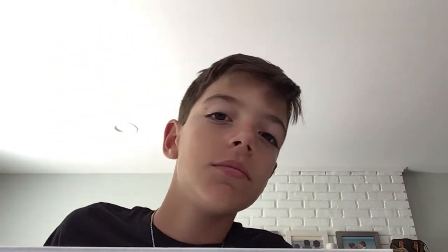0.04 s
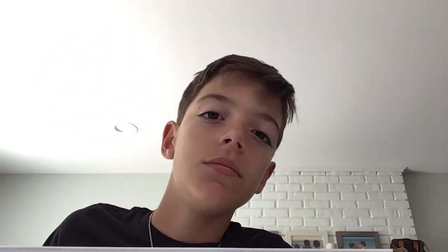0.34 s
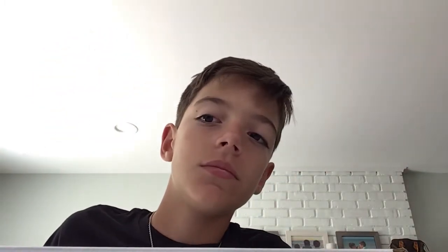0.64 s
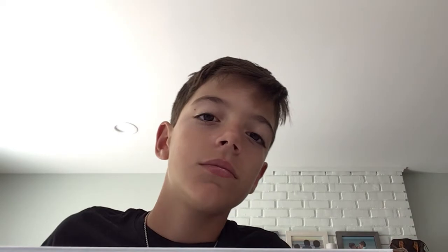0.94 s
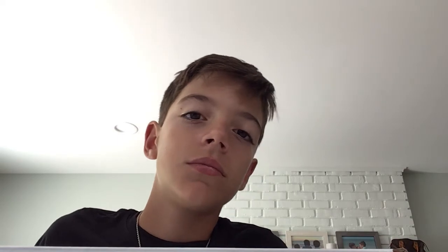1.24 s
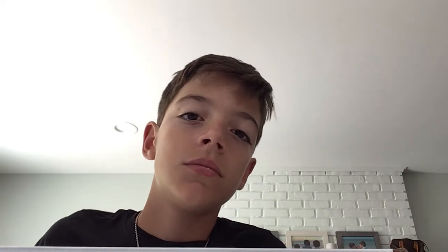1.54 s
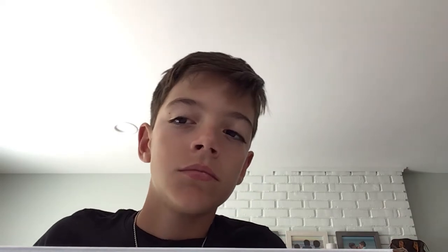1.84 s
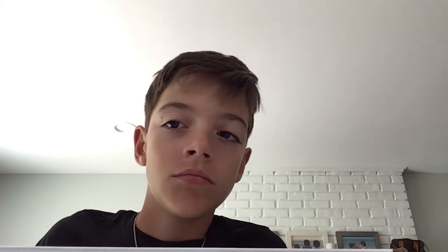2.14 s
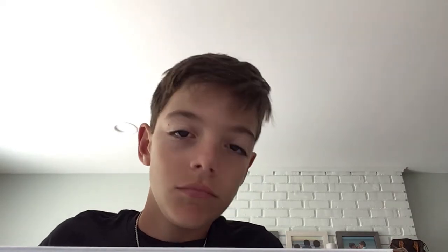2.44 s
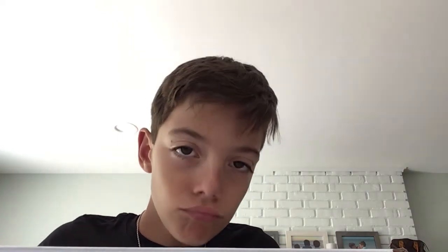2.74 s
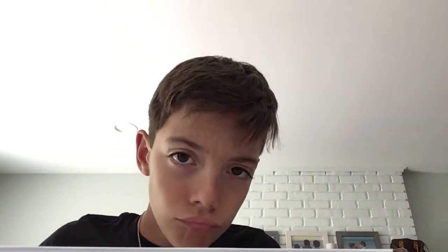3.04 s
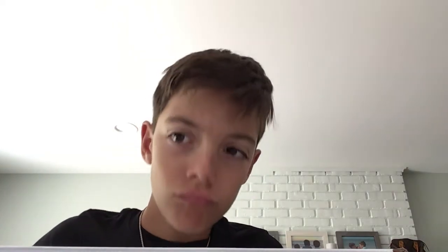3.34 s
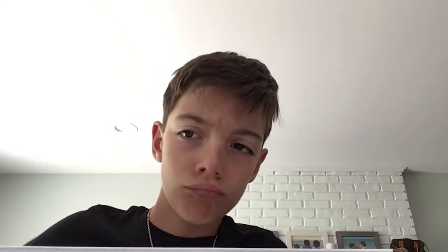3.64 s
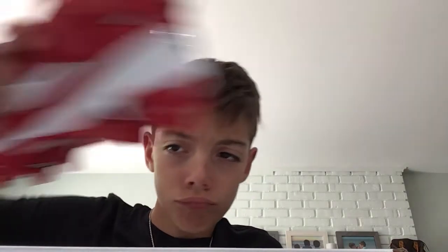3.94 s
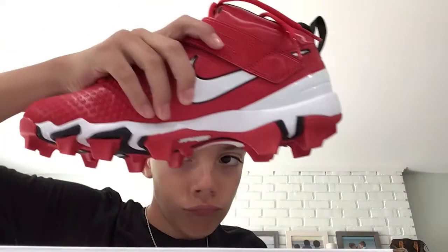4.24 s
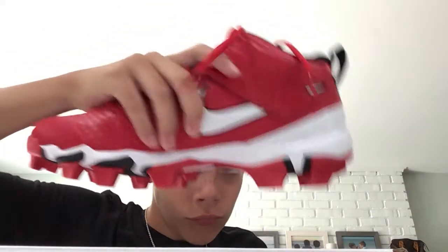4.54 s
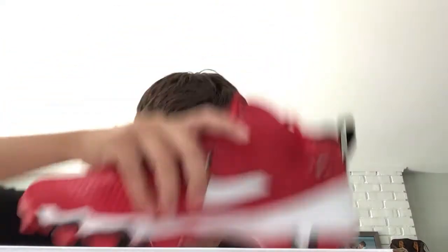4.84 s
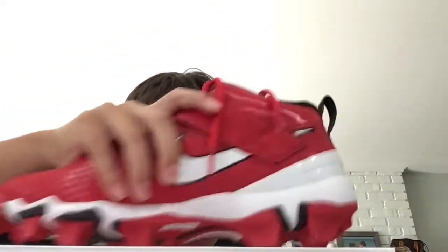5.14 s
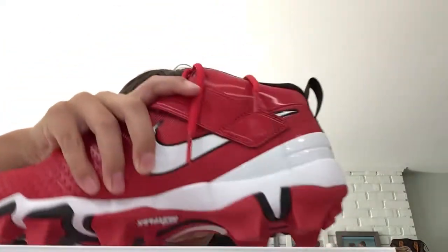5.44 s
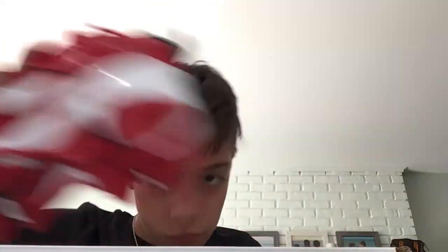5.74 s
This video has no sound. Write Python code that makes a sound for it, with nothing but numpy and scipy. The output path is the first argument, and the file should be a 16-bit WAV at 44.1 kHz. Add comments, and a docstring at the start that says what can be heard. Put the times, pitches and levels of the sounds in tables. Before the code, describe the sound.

Faint, steady room air runs throughout, heard from a microphone close by on a desk. At about 0.7 seconds a light rustle begins, followed near 1.1 seconds by a quick cluster of soft, dull hand knocks, each with a small hollow ring, and a brief scuff of skin. A low rub at 1.5 seconds leads into more knocks and scuffs from 1.7 to 2.1, and again from 2.6 to 3. At 3.3 seconds comes one more soft knock and a small, bright metallic tick. From 3.8 to 4.6 a shoe is lifted with a faint rustle and a few tiny, very high squeaks. At 4.9 and 5.25 seconds its studded sole is tapped on the desk, by far the loudest sounds: sharp snaps with a brief rattle and a low boom, ringing shortly in the room. Then only the room air remains.

```python
"""A desk in a quiet room, the microphone close to a baseball cleat being handled.
Over steady room air, the hands rustle, make soft knocks that ring a small hollow casing, and scuff.
Just after three seconds a bit of metal ticks; then the shoe is lifted with a faint rustle and thin squeaks.
Around five seconds its studded sole is tapped twice on the desk: the studs snap, the shoe rattles,
the desk top booms and the room answers."""
import sys
import numpy as np
from scipy import signal
from scipy.fft import rfft, irfft
from scipy.io import wavfile
from scipy.ndimage import uniform_filter1d

SR = 44100
rng = np.random.default_rng(int(sys.argv[2]) if len(sys.argv) > 2 else 0)


def unload_wav(signal):
    """Save mono or channel-first audio to the path in sys.argv[1] as 16-bit WAV at rate SR, clipped to [-1, 1]."""
    wavfile.write(
        sys.argv[1],
        SR,
        np.round(np.clip(np.atleast_2d(signal).T, -1, 1) * 32767).astype(np.int16),
    )


N = 259654
T = np.arange(SR // 2) / SR  # time since a contact, s


def amp(db):
    """Decibels to gain."""
    return 10 ** (np.asarray(db) / 20)


def unit_rms(x):
    """Scales to rms 1."""
    return x / np.sqrt(np.mean(x ** 2) + 1e-20)


def lookup(table, hz, column=1):
    """Reads one column of a table along log frequency."""
    columns = np.transpose(table)
    return np.interp(np.log(hz + 1), np.log(columns[0] + 1), columns[column])


def add(mix, start, sound):
    """Mixes a sound in at a start time in seconds."""
    part = mix[max(round(start * SR), 0):][:len(sound)]
    part += sound[:len(part)]


def hump(hz, octaves):
    """A flat-topped spectrum around one pitch, as rows of f/Hz, level/dB."""
    away = np.arange(-20, 21) / 10
    return np.transpose([hz * 2 ** (away * octaves), -4.3 * away ** 4])


def noise(spectrum, size=len(T)):
    """Noise of rms 1 with the given spectrum."""
    colour = amp(lookup(spectrum, np.fft.rfftfreq(size, 1 / SR)))
    return unit_rms(irfft(rfft(rng.standard_normal(size)) * colour, size))


def roughness(size, depth_db, grain_samples):
    """The randomly wavering gain of uneven friction."""
    return amp(depth_db * unit_rms(uniform_filter1d(rng.standard_normal(size), grain_samples)))


def onset(rise):
    """A smooth climb to full level over the rise time in seconds."""
    return np.sin(np.pi / 2 * np.minimum(T / rise, 1)) ** 2


def fade(t60, rise):
    """A contact builds up over the rise time, then dies away."""
    return onset(rise) * amp(-60 * T / t60)


def burst(spectrum, t60, rise):
    """A short contact noise whose spectrum is kept smooth, so that it has no pitch of its own."""
    envelope = fade(t60, rise)
    colour = amp(lookup(spectrum, np.fft.rfftfreq(len(T), 1 / SR)))
    x = envelope * noise(spectrum)
    for _ in range(2):
        phase = np.angle(rfft(x))
        x = irfft(colour * np.exp(1j * phase), len(T)) * envelope ** (1 / 3)
    return unit_rms(x * onset(rise)) * np.sqrt(np.mean(envelope ** 2))


def ring(modes, rise, spread):
    """Damped modes of alternating sign, a little detuned at each blow."""
    detune = 1 + spread * rng.standard_normal(len(modes))
    return sum((-1) ** k * amp(db) * fade(t60, rise) * np.sin(2 * np.pi * hz * detune[k] * T)
               for k, (hz, db, t60) in enumerate(modes))


# air of the room: f/Hz, relative level/dB
AIR_SPECTRUM = [(15, -79), (25, -68), (43, -14.5), (108, -3.5), (145, 3), (180, -7.5), (242, -9.5),
                (317, -13), (354, -3.5), (384, -24.5), (416, -10), (1040, -25), (1230, -26), (7710, -34.5),
                (16000, -43)]
# faint tones in the room: f/Hz, level/dB
ROOM_HUM = [(140, -73.5), (356, -73.5), (414, -69.5)]


def room_tone():
    """The quiet room at the microphone: steady air noise with a few wavering low tones."""
    tones = sum(amp(db) * noise(hump(hz, octaves=0.038), size=N) for hz, db in ROOM_HUM)
    return amp(-58) * noise(AIR_SPECTRUM, size=N) + tones


# strokes of sleeve and shoe: start t/s, end t/s, level/dB, centre f/Hz
RUB_STROKES = [(0.699, 0.936, -75.5, 2490), (0.72, 1.06, -76, 9500), (1.5, 1.66, -53.5, 156),
               (1.625, 1.726, -72.5, 8400), (3.857, 4.053, -66.5, 2070), (4.047, 4.5, -78.5, 11000),
               (3.8, 4.6, -64.5, 136)]


def rubs():
    """Cloth and shoe rub slowly near the microphone, each stroke swelling as it gathers speed."""
    out = np.zeros(N)
    for start, end, db, hz in RUB_STROKES:
        n = round((end - start) * SR)
        catch = roughness(n, depth_db=3, grain_samples=300)
        stroke = amp(db + np.linspace(-1, 1, n)) * signal.windows.tukey(n, .3)
        friction = unit_rms(catch * noise(hump(hz, octaves=.82), size=n))
        add(out, start, stroke * friction)
    return out


# hands knocking at the desk: t/s, force level/dB, casing ring level/dB
HAND_KNOCKS = [(.753, -49.5, -56), (.888, -54, -50.5), (1.045, -36, -42), (1.053, -29.5, -27.5),
               (1.1, -27.5, -22), (1.735, -33.5, -47), (1.746, -31, -33), (1.792, -22.5, -26),
               (1.8975, -45, -29.5), (1.995, -34, -35.5), (2.0337, -34.5, -29.5), (2.0623, -42, -29),
               (2.576, -51, -42.5), (2.6861, -31, -25), (2.756, -37.5, -43), (2.773, -38.5, -50),
               (2.837, -40.5, -28.5), (2.8715, -38.5, -28), (3.3214, -38.5, -34)]
# dull thump of a knock: f/Hz, relative level/dB
THUMP_SPECTRUM = [(40, -16), (60, -6), (92, 7), (125, 1), (200, 0.5), (280, -0.5), (400, 0.5), (700, -5),
                  (1050, -9), (2000, -29), (6000, -40)]


def soft_knocks():
    """A small click of first contact over a dull thump; the harder the knock, the louder its click."""
    firm_db, firm_click_db, click_growth = -30, -39.5, 1.59  # growth in dB per dB of force
    out = np.zeros(N)
    for start, force_db, _ in HAND_KNOCKS:
        click_db = firm_click_db + click_growth * (force_db - firm_db)
        click = burst(hump(1896, octaves=0.75), t60=0.027, rise=0.0017)
        add(out, start - .0028, amp(click_db) * click)
        add(out, start, amp(force_db) * burst(THUMP_SPECTRUM, t60=0.068, rise=0.0035))
    return signal.sosfilt(signal.butter(4, [72, 7000], "bandpass", fs=SR, output="sos"), out)


# modes of the small casing: f/Hz, relative level/dB, t60/s
CASING_MODES = [(367, -10, 0.029), (493, -6.5, 0.083), (592.7, 3.5, 0.044), (644, -11, 0.036),
                (949, -21.5, 0.023)]


def casing_ring():
    """Each soft knock rings a small hollow casing beside the microphone."""
    out = np.zeros(N)
    for start, _, ring_db in HAND_KNOCKS:
        add(out, start, amp(ring_db) * ring(CASING_MODES, rise=.0014, spread=.012))
    return out


# skin skidding as it lands: peak t/s, level/dB, t60/s
SKIN_SCUFFS = [(1.057, -34.5, 0.14), (1.739, -37, 0.13), (1.996, -40, 0.084), (2.036, -45.5, 0.019),
               (2.684, -41.5, 0.16), (2.869, -44.5, 0.17), (2.972, -47, 0.023)]
# friction of skin: f/Hz, relative level/dB
SCUFF_SPECTRUM = [(300, 26), (1000, 3.5), (3500, 1.5), (5000, -2.5), (8000, -6), (13000, -19), (16000, -55)]


def scuffs():
    """Grainy friction swells as the grip lands and stops as it holds."""
    lead_s, grip_rise_s = 0.05, 0.0055
    from_peak = T - lead_s
    out = np.zeros(N)
    for peak, db, t60 in SKIN_SCUFFS:
        swell = np.exp(np.minimum(from_peak, 0) / grip_rise_s)
        decay = amp(-60 * np.maximum(from_peak, 0) / t60)
        grain = roughness(len(T), depth_db=4.2, grain_samples=40)
        add(out, peak - lead_s, amp(db) * swell * decay * unit_rms(grain * noise(SCUFF_SPECTRUM)))
    return out


# tiny metallic ticks: t/s, level/dB
METAL_TICKS = [(3.3443, -34), (3.476, -59), (4.392, -59)]
# snap of a tick: f/Hz, relative level/dB
TICK_SPECTRUM = [(2000, -17), (6000, -17), (7500, -18), (11000, -2), (13200, -5), (14500, -29)]
# modes of the metal: f/Hz, relative level/dB, t60/s
METAL_MODES = [(7430, -13, 0.022), (8700, -4, 0.013), (10900, -3.5, 0.011)]


def metal_ticks():
    """A small piece of metal ticks close by: a dry snap with a brief ring."""
    out = np.zeros(N)
    for start, db in METAL_TICKS:
        snap = amp(-2) * burst(TICK_SPECTRUM, t60=0.0079, rise=0.00077)
        ringing = amp(1.5) * ring(METAL_MODES, rise=.0004, spread=.003)
        add(out, start, amp(db) * (snap + ringing))
    return out


# the grip shifting on the shoe: t/s, level/dB
FINGER_SLIPS = [(4.39, -60), (4.447, -66), (4.47, -72)]


def squeaks():
    """Fingers slip on the glossy upper in faint, brief squeaks, all at one very high pitch."""
    out = np.zeros(N)
    for start, db in FINGER_SLIPS:
        add(out, start, amp(db) * fade(t60=0.061, rise=.003) * noise(hump(15300, octaves=.04)))
    return out


# single studs meeting the desk: t/s, snap level/dB, snap t60/s, clack level/dB
STUD_HITS = [(4.8822, -33, .02, -33), (4.8851, -13, .003, -20), (4.8905, -31, .012, -30),
             (5.2392, -27, .004, -22), (5.2441, -21.5, .003, -30)]
# snap of a stud: f/Hz, relative level/dB
STUD_SPECTRUM = [(200, 2), (1000, 14.5), (3300, 8.5), (5000, 0.5), (7000, 6), (11000, -1.5), (16000, -9)]
# modes of the stiff plastic sole: f/Hz, relative level/dB, t60/s
SOLE_MODES = [(1360, -16, .018), (2120, -24, .013), (2950, -8, .014), (3345, -6.5, 0.02),
              (4000, -15.5, 0.036)]


def stud_snaps():
    """Close to the microphone, hard studs hit the desk one after another and make the sole clack."""
    out = np.zeros(N)
    for start, snap_db, t60, clack_db in STUD_HITS:
        add(out, start, amp(snap_db) * burst(STUD_SPECTRUM, t60, rise=.0002))
        add(out, start, amp(clack_db) * ring(SOLE_MODES, rise=0.00045, spread=0.015))
    return out


# sole on the desk, two blows to a tap: t/s, boom level/dB, place on the desk/0-1, rattle level/dB
SOLE_BLOWS = [(4.885, -0.5, 0.29, -15.5), (4.903, -4.5, 0.9, -27.5), (5.2421, -1.5, 0.91, -23.5),
              (5.2561, -16.5, 0.86, -27.5)]
# dense rattle of the sole: f/Hz, relative level/dB
RATTLE_SPECTRUM = [(60, -12), (110, 6), (500, 8.5), (750, 4), (1200, 1), (1800, -9), (3000, -14.5),
                   (4200, -17.5), (5000, -22), (10000, -29.5), (16000, -44)]


def sole_rattle():
    """Each blow leaves the whole shoe rattling briefly."""
    out = np.zeros(N)
    for start, _, _, rattle_db in SOLE_BLOWS:
        add(out, start - .002, amp(rattle_db) * burst(RATTLE_SPECTRUM, t60=0.1, rise=0.0025))
    return out


# modes of the desk top: f/Hz, level/dB struck at place 0, level/dB struck at place 1, t60/s
DESK_MODES = [(73, -27, -14, 0.097), (94, -16, -22.5, 0.15), (148, -4, -14.5, 0.12),
              (212, -8.5, -19.5, 0.095), (250, -25, -20, 0.21), (294.8, -13, -12.5, 0.12),
              (330, -20, -24, 0.15), (372.4, -11.5, -22, 0.23), (469, -4.5, -13, 0.052),
              (586, -15.5, -24, 0.13), (662, -38, -28.5, 0.15), (823, -26, -37, 0.21),
              (874, -28.5, -31, .11), (988, -35, -26.5, 0.04), (1051, -23, -32, 0.066),
              (1213, -13.5, -53, 0.048), (1660, -41, -37, 0.085)]


def desk_boom():
    """The weight of the shoe sets the desk top booming; its deep modes take longest to build up."""
    out = np.zeros(N)
    for start, boom_db, place, _ in SOLE_BLOWS:
        for k, (hz, db_at_0, db_at_1, t60) in enumerate(DESK_MODES):
            mode_db = boom_db + db_at_0 + place * (db_at_1 - db_at_0)
            envelope = fade(t60, rise=0.0021 * (500 / hz) ** 1.83)
            add(out, start, (-1) ** k * amp(mode_db) * envelope * np.sin(2 * np.pi * hz * T))
    return out


# near wall, ceiling and far walls, heard from the desk: delay t/s, level/dB
WALL_ECHOES = [(.0068, -16), (0.0125, -13.5), (0.0157, -18), (.0225, -19), (.037, -22.5)]
# diffuse tail of the room: f/Hz, relative level/dB, t60/s
ROOM_TAIL = [(80, -6.5, 0.61), (159.5, -6, 0.28), (405, -5.5, 0.54), (1000, -14, 0.53), (3000, -7, 0.52),
             (5000, -7, 0.39), (7980, -7, 0.41), (14100, -9, 0.28)]


def room_answer(x):
    """What the room gives back: a few dull early echoes, then a diffuse tail that dies band by band."""
    early = np.zeros(len(T))
    for delay, db in WALL_ECHOES:
        early[round(delay * SR)] += amp(db)
    early = signal.lfilter(*signal.butter(1, 3000, fs=SR), early)
    hz, t, bands = signal.stft(rng.standard_normal(len(T)), SR, nperseg=256)
    t60 = lookup(ROOM_TAIL, hz, column=2)[:, None]
    bands *= amp(lookup(ROOM_TAIL, hz)[:, None] - 60 * t / t60)
    bands *= np.sqrt(2 * np.log(1000) / (t60 * SR))  # a band's energy is independent of its decay time
    build_up = np.clip((T - .004) / 0.0027, 0, 1)
    tail = signal.istft(bands, SR, nperseg=256)[1][:len(T)] * build_up
    return signal.fftconvolve(x, early + amp(1.5) * tail)[:N]


def scene():
    """All in one room; what reaches the microphone through the desk or from close by is drier."""
    handling = sole_rattle() + soft_knocks() + scuffs() + rubs() + squeaks()
    boom, casing = desk_boom(), casing_ring()
    clicks = stud_snaps() + metal_ticks()
    answer = room_answer(handling + casing + amp(-6) * boom + amp(-9.5) * clicks)
    return (handling + boom + casing + clicks + answer + room_tone())[None]


def record(dry):
    """One small microphone at the desk, in mono; the deep bass and the highest treble are lost."""
    low_hz, high_hz = 52, 16100
    thin = signal.sosfilt(signal.butter(8, low_hz, "highpass", fs=SR, output="sos"), dry)
    band_limit = signal.firwin(255, high_hz, window=("kaiser", 9), fs=SR)
    return signal.oaconvolve(thin, band_limit[None], "same")


dry = scene()
out = record(dry)
unload_wav(out)
```